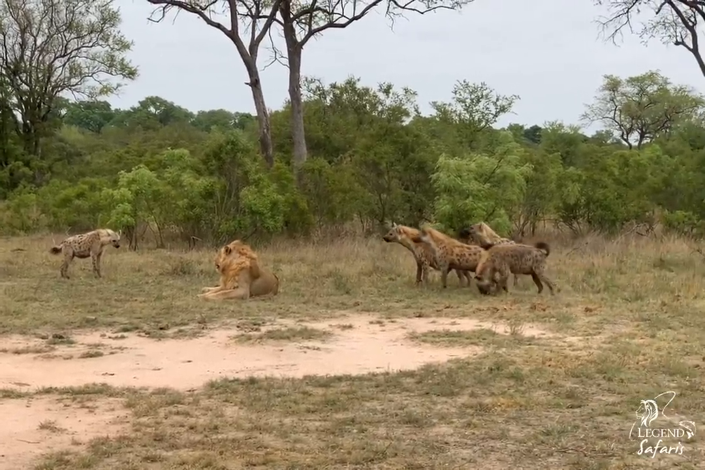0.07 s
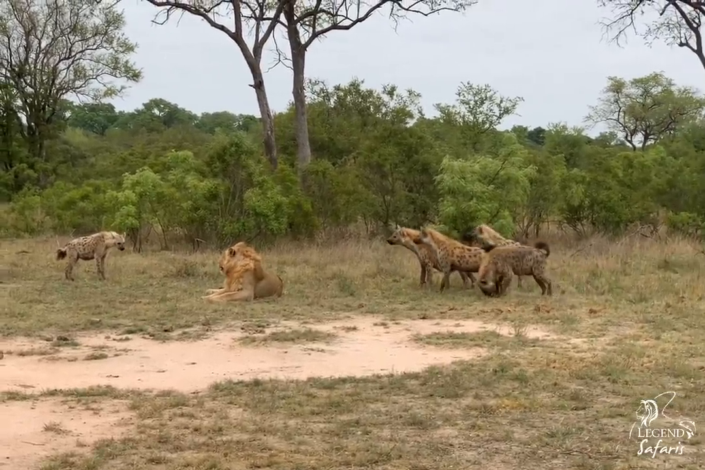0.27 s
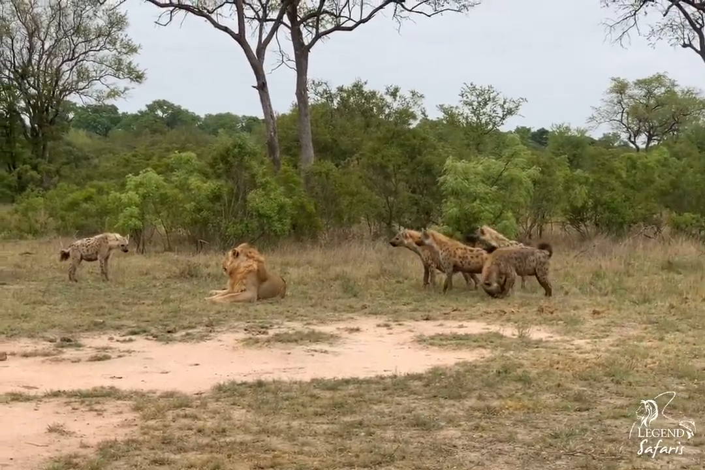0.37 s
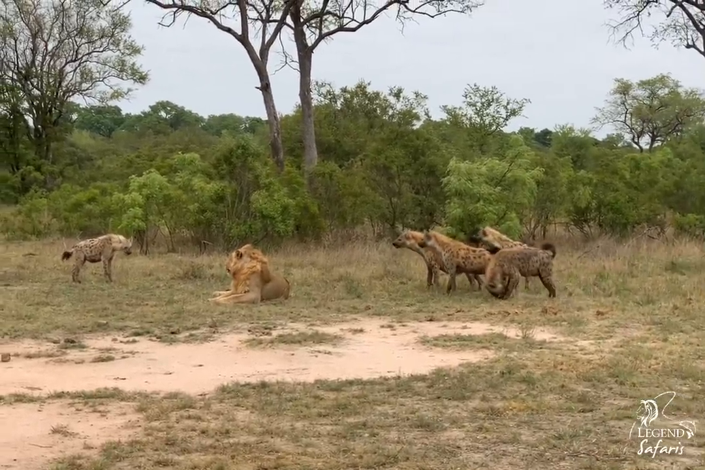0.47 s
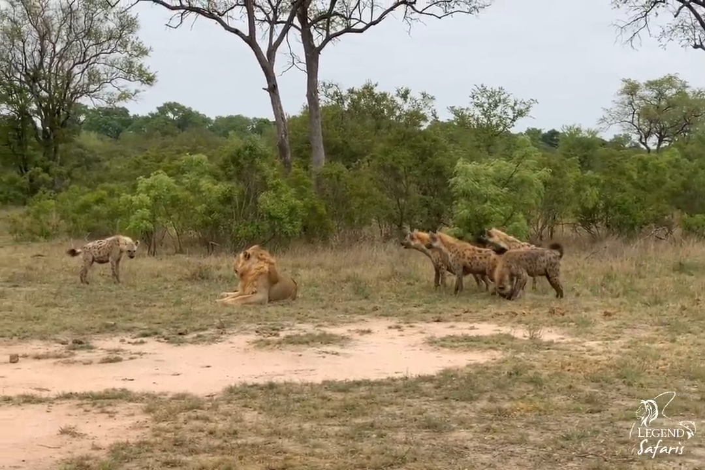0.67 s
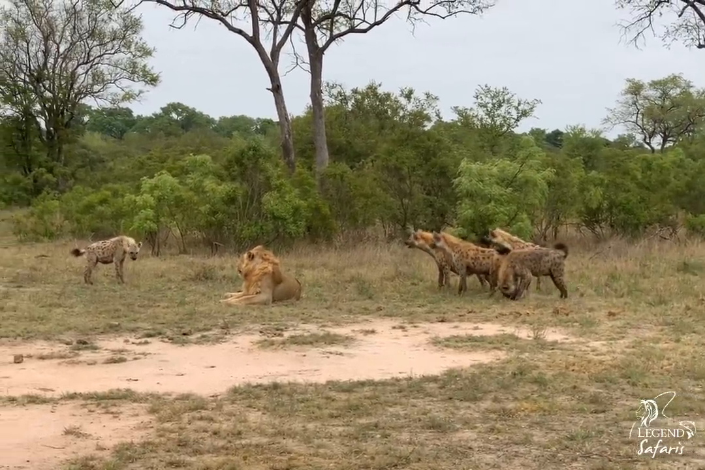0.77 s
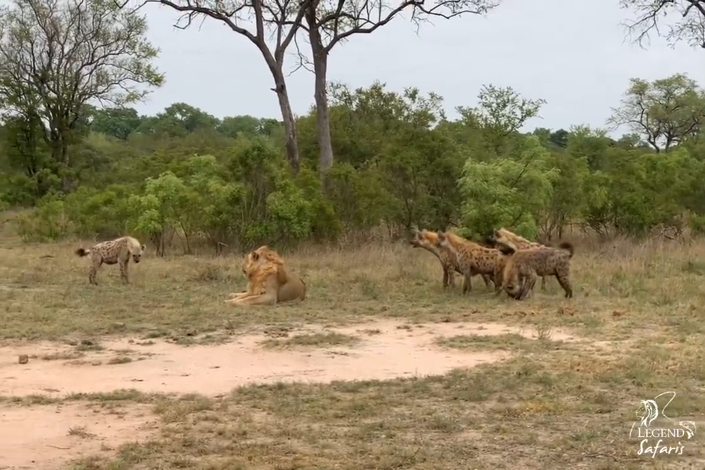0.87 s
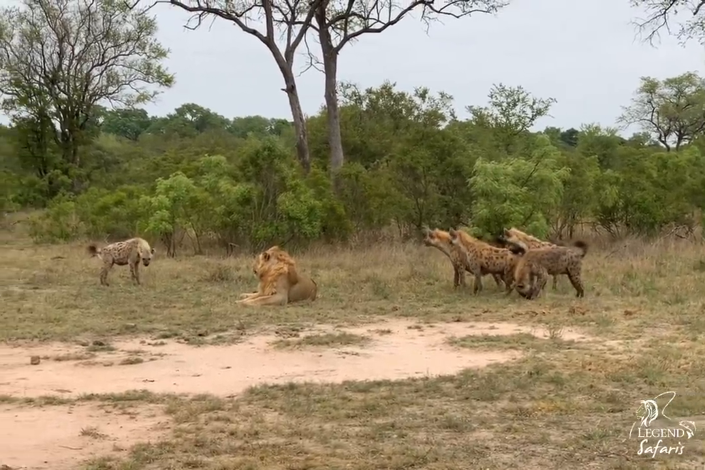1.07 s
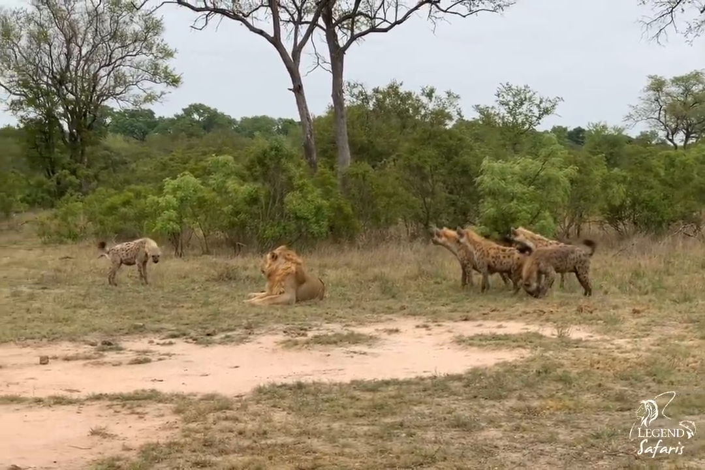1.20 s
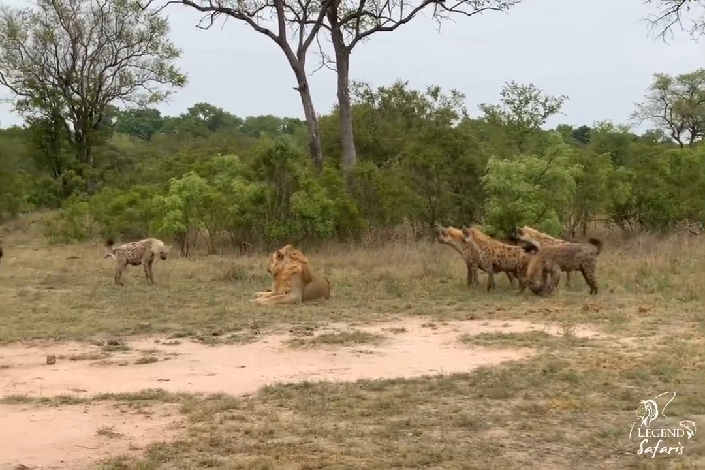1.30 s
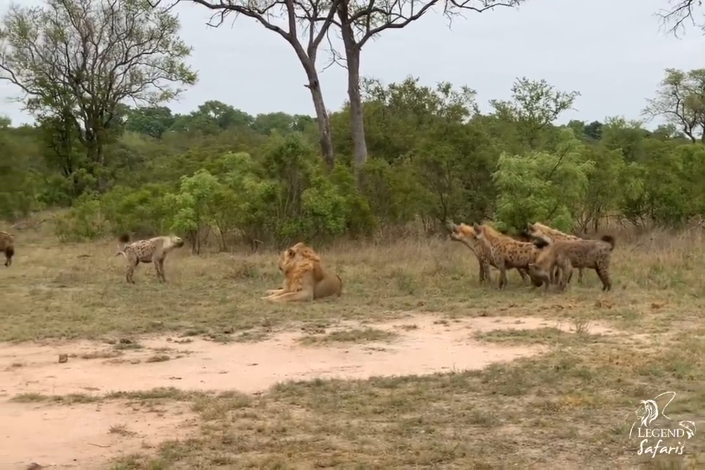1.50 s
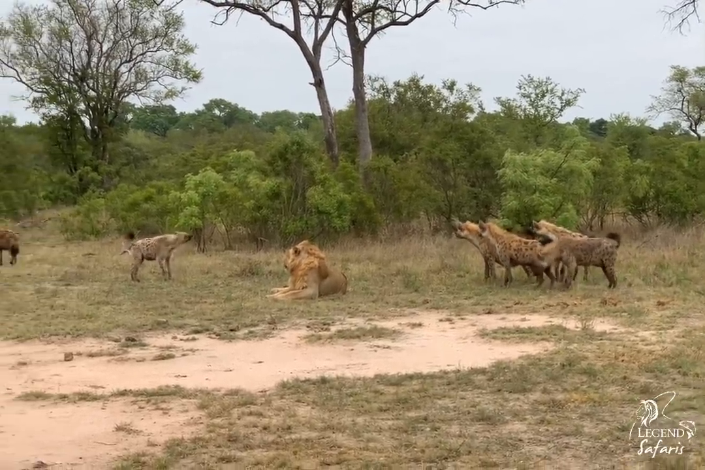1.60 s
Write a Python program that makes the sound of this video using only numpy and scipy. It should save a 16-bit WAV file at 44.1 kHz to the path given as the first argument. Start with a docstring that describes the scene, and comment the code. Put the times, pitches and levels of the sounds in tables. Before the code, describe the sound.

One hyena call climbs from a low moan to a high, cracking cry.

```python
"""A hyena gives one whoop on open savanna: a low clear moan climbs, splits into half pitch,
then breaks upward into a loud cracking cry that drops away. Its vocal folds sound a harmonic
stack coloured by the throat; the air flow adds rasp and hiss. Bushes scatter the call back;
faint birds whistle over a low outdoor rumble."""
import sys
import numpy as np
from scipy import signal
from scipy.fft import rfft, irfft
from scipy.io import wavfile
from scipy.ndimage import map_coordinates

SR = 44100
rng = np.random.default_rng(int(sys.argv[2]) if len(sys.argv) > 2 else 0)


def digitize_waveform(pressure):
    """Quantize a signal to 16-bit integers and store it at the path in sys.argv[1].

    Rows of a 2-D input are taken as channels; values are limited to [-1, 1].
    """
    field = np.atleast_2d(pressure).T
    bounded = np.clip(field, -1, 1)
    quanta = np.round(bounded * 32767).astype(np.int16)
    wavfile.write(sys.argv[1], SR, quanta)


N = 72765
TOP_HZ = 14500


def undb(db):
    """Decibels to gain."""
    return 10 ** (np.asarray(db) / 20)


def curves(table):
    """Each value column of a timed table, linearly interpolated per sample."""
    rows = np.array(table, float)
    return [np.interp(np.arange(N) / SR, rows[:, 0], column) for column in rows.T[1:]]


def ramp(x, middle, width):
    """Linear step from 0 to 1, centred on middle."""
    return np.clip((x - middle) / width + .5, 0, 1)


def response(points, hz):
    """Gain of a (Hz, dB) shape at the given frequencies."""
    f, db = np.array(points, float).T
    return undb(np.interp(np.log(np.maximum(hz, 1)), np.log(f), db))


def colour(x, points):
    """Filter by a (Hz, dB) shape."""
    return irfft(rfft(x, 2 * N) * response(points, np.linspace(0, SR / 2, N + 1)))[..., :N]


def noise(points):
    """Coloured noise, unit RMS."""
    x = colour(rng.standard_normal(N), points)
    return x / x.std()


def walk(rate_hz):
    """Smooth random curve, spread about 1, with rate_hz new values a second."""
    steps = rng.standard_normal(2048)
    return map_coordinates(steps, [np.arange(N) / SR * rate_hz], order=3, mode="wrap")


def rumble(mid_db=-56, side_re_mid_db=-14):
    """Low outdoor background, nearly the same in both channels."""
    # Each row: frequency in Hz, relative density in dB.
    spectrum = [(20,-22.5),(55,6),(120,3.5),(170,-5.5),(800,-23.5),(4500,-43),(14000,-53)]
    return undb(mid_db) * (noise(spectrum) + undb(side_re_mid_db) * noise(spectrum) * np.array([[1], [-1]]))


def birds():
    """Thin distant whistles, slurred downward."""
    # Each row: start in seconds, length in seconds, start pitch in Hz, end pitch in Hz, relative dB.
    whistles = [(0.268,.11,3440,3110,-81.5),(1.431,0.26,2573,2430,-75)]
    out = np.zeros(N)
    for start_s, length_s, from_hz, to_hz, db in whistles:
        along = np.clip((np.arange(N) / SR - start_s) / length_s, 0, 1)
        hz = (from_hz + (to_hz - from_hz) * along) * (1 + .008 * walk(120))
        envelope = undb(db + 2 * walk(27)) * 2 * np.sin(np.pi * along)
        out += envelope * np.sin(2 * np.pi * np.cumsum(hz) / SR)
    return out


def bushes(x, tail_db=-12, t60_s=.5, reflections_per_s=400, belt_spread_s=.016):
    """A thin tail of separate reflections, plus an echo cluster from each belt of bushes."""
    # Each row: frequency in Hz, gain in dB.
    scatter_colour = [(150,-5.5),(7000,-0.5)]
    # Each row: delay in seconds, level in dB.
    belts = [(0.109,-23),(0.224,-31.5)]
    t = np.arange(N) / SR
    tail = np.exp(-np.log(1000) * t / t60_s)
    clusters = [(np.exp(-((t - delay_s) / belt_spread_s) ** 2), db) for delay_s, db in belts]
    chance = reflections_per_s / SR
    paths = 0
    for envelope, db in [(tail, tail_db)] + clusters:
        mid, side = (envelope * rng.standard_normal(N) * (rng.random(N) < chance) for _ in range(2))
        stereo = mid + .5 * side * np.array([[1], [-1]])
        paths = paths + undb(db) * stereo / np.linalg.norm([mid, side])
    return signal.fftconvolve(colour(x, scatter_colour)[None], paths, axes=1)[:, :N]


def ports(x):
    """The direct call reaches the two microphone ports with different phase and colour."""
    # Each row: frequency in Hz, left minus right in dB.
    balance = [(240,6),(380,-1.5),(760,3.5),(1150,0),(8000,4)]
    # Each row: frequency in Hz, phase lead of the left port in radians.
    left_lead = [(100,0),(800,0.81),(2500,-2),(5600,-2),(7200,-6.5)]
    hz = np.linspace(0, SR / 2, N + 1)
    ratio = response(balance, hz)
    lead_rad = np.interp(hz, *np.array(left_lead).T)
    gains = np.array([ratio * np.exp(1j * lead_rad), np.ones(N + 1)]) * 2 / (1 + ratio)
    return irfft(rfft(x, 2 * N) * gains)[:, :N]


def throat_catch(length_s=.01):
    """Two lone flaps of the vocal folds ring the throat and start the call."""
    # Each row: start in seconds, relative level in dB.
    flaps = [(.096,-49),(.109,-52)]
    # Each row: frequency in Hz, gain in dB.
    modes = [(270,12.5),(720,3)]
    out = np.zeros(N)
    for start_s, db in flaps:
        age_s = np.maximum(np.arange(N) / SR - start_s, 0)
        ring = sum(undb(mode_db) * np.sin(2 * np.pi * hz * age_s) for hz, mode_db in modes)
        out += undb(db) * ring * np.sin(np.pi * np.minimum(age_s / length_s, 1)) ** 2
    return out


def fold_stall(width_s=.004):
    """How far the vocal folds stall, 0-1: a short pulse at each crack of the voice."""
    # Each row: time in seconds, depth 0-1.
    cracks = [(1.195,0.7),(1.223,0.8),(1.238,.6),(1.267,.6),(1.351,0.4)]
    t = np.arange(N) / SR
    return sum(depth * np.exp(-((t - at_s) / width_s) ** 2) for at_s, depth in cracks).clip(0, 1)


def half_pitch(pitch_hz, phase):
    """Strong and weak fold cycles alternate before the break, adding tones between the harmonics."""
    # Each row: time in seconds, relative level in dB.
    levels = [(.54,-74),(.666,-58.5),(.765,-56),(.815,-45.5),(1.09,-38.5),(1.135,-71)]
    # Each row: frequency in Hz, gain in dB.
    throat = [(190,-5),(590,6),(960,3.5),(1340,-30),(1800,-21),(3000,-44)]
    db, = curves(levels)
    return undb(db) * sum(response(throat, k * pitch_hz) * np.sin(k * phase) for k in np.arange(8) + .5)


def overtones(pitch_hz, phase, level_db, flutter, flutter_hz):
    """Harmonics 3-23, coloured by the throat; they flicker, and break up in the whoop."""
    # Each row of both: frequency in Hz, gain in dB.
    moan_throat = [(720,5),(1000,-3),(1190,-1.5),(1400,-14),(1850,-17),(2700,-35),(4400,-38),(5100,-57.5),(6100,-35.5),(8000,-50)]
    whoop_throat = [(1900,-1),(2800,-20.5),(3600,-16.5),(4400,-26),(6100,-39.5),(7100,-17.5),(8800,-28),(10600,-24),(14500,-39.5)]
    break_s, opens_s = 1.118, .46
    muffle_hz, muffle_db = 1205, -12
    flicker_db, whoop_flicker_db, smear_rad = 3, 2, .9
    t = np.arange(N) / SR
    in_whoop = ramp(t, break_s, width=.04)
    mouth_shut = 1 - ramp(t, opens_s, width=.031)  # nearly shut at first: muffles the highs
    out = np.zeros(N)
    for k in range(3, 24):
        hz = k * pitch_hz
        throat = (1 - in_whoop) * response(moan_throat, hz) + in_whoop * response(whoop_throat, hz)
        db = level_db + muffle_db * mouth_shut * ramp(hz, muffle_hz, muffle_hz / 10)
        db += flicker_db * walk(39.83) + in_whoop * whoop_flicker_db * walk(flutter_hz)
        smear = smear_rad * k * flutter * walk(260) + 2 * np.pi * rng.random()
        out += undb(db) * throat * (hz < TOP_HZ) * np.sin(k * phase + smear)
    return out


def hyena():
    """Vocal folds sound a harmonic stack; uneven cycles flutter and crack; the air flow rasps."""
    # Each row of both: time in seconds, pitch in Hz, harmonics 1 and 2 in relative dB.
    moan = [(0.11,228.3,-47.5,-54.5),(0.146,234.3,-37.5,-48.5),(0.246,260.2,-32.5,-39.5),(0.3,302,-29,-34),(.35,319.9,-24.5,-34),(0.403,334.9,-24,-51),(0.468,356.8,-19,-35.5),(0.497,366.4,-25,-33),(0.643,376,-25,-29.5),(0.744,384.6,-21.5,-30),(.81,379.6,-21.5,-29),(0.93,384.2,-21,-26.5),(1.017,393.4,-23.5,-23),(1.058,411.3,-27,-30.5)]
    whoop = [(1.084,418,-17.5,-36),(1.103,548.9,-22,-28),(1.124,592,-26,-26.5),(1.152,626.4,-19.5,-39),(1.18,667.5,-16.5,-35.5),(1.21,742,-20,-50.5),(1.243,790.4,-18.5,-50.5),(1.263,833.6,-25,-42),(1.317,890.4,-22.5,-35.5),(1.34,852,-20,-41.5),(1.361,750.3,-21,-53),(1.375,603.7,-22,-50),(1.412,315,-48,-60)]
    # Each row: time in seconds, overtones, rasp and hiss in relative dB, flutter 0-1.
    quality = [(.11,-61,-70.5,-93.5,0.1),(.2,-60,-73,-90.5,0),(.29,-46,-54.5,-74,0.01),(.42,-46.5,-51.5,-76,0),(.57,-50.5,-45.5,-79,0.08),(.71,-48.5,-53,-79.5,0),(.757,-49,-41,-74.5,0.13),(.82,-50,-55,-79,0.01),(1.03,-51,-55,-77.5,0.08),(1.095,-49.5,-34,-70.5,0.11),(1.13,-59.5,-42,-61.5,0.3),(1.195,-52.5,-34.5,-74.5,0.4),(1.285,-52.5,-50,-73,0.3),(1.32,-42,-59.5,-67.5,0.05),(1.37,-56.5,-38,-65.5,0.35),(1.42,-62,-48.5,-77,0.5)]
    # Each row of both: frequency in Hz, relative density in dB.
    rasp_spectrum = [(200,-12.5),(480,14.5),(630,20.5),(720,9.5),(815,14.5),(980,7.5),(1200,12.5),(1400,-7.5),(2200,-12),(3200,-41)]  # turbulence ringing the throat
    hiss_spectrum = [(2000,-2),(4200,8),(5200,-7.5),(5900,28),(7000,14.5),(7700,-4),(10500,12),(15000,-12.5)]  # air at the teeth
    attack_s, release_s = .0089, .058
    jitter, flutter_jitter, crack_sag = .00096, .04, .2  # fractions of the pitch
    flutter_hz, flutter_db, sputter_db = 130.6, 4.5, 11.5
    pitch_hz, first_db, second_db = curves(moan + whoop)
    overtone_db, rasp_db, hiss_db, flutter = curves(quality)
    stall = fold_stall()

    wobble = 1 + jitter * walk(250) + flutter_jitter * flutter * walk(flutter_hz)
    hz = pitch_hz * wobble * (1 - crack_sag * stall ** 2)
    phase = 2 * np.pi * np.cumsum(hz) / SR
    tone = undb(first_db) * np.sin(phase) - undb(second_db) * np.cos(2 * phase)
    tone += overtones(pitch_hz, phase, overtone_db, flutter, flutter_hz)
    tone += half_pitch(pitch_hz, phase)
    tone *= np.sqrt(2) * undb(flutter_db * flutter * walk(flutter_hz))

    hiss = undb(hiss_db + sputter_db * flutter * walk(flutter_hz)) * noise(hiss_spectrum)
    hiss *= 1 + np.sin(phase)  # one puff per fold cycle
    rasp = undb(rasp_db) * noise(rasp_spectrum)

    t = np.arange(N) / SR
    onset = ramp(t, moan[0][0] + attack_s / 2, attack_s)
    release = 1 - ramp(t, whoop[-1][0], release_s)
    return onset * release * ((tone + hiss) * (1 - stall) + rasp)


def scene():
    """Background and birds under the call, scattered and direct."""
    call = hyena() + throat_catch()
    return rumble() + bushes(call) + birds() + ports(call)


def record(dry):
    """Steep low-pass at TOP_HZ."""
    return signal.sosfilt(signal.ellip(8, .2, 70, TOP_HZ, fs=SR, output="sos"), dry)


dry = scene()
out = record(dry)
digitize_waveform(out)
```